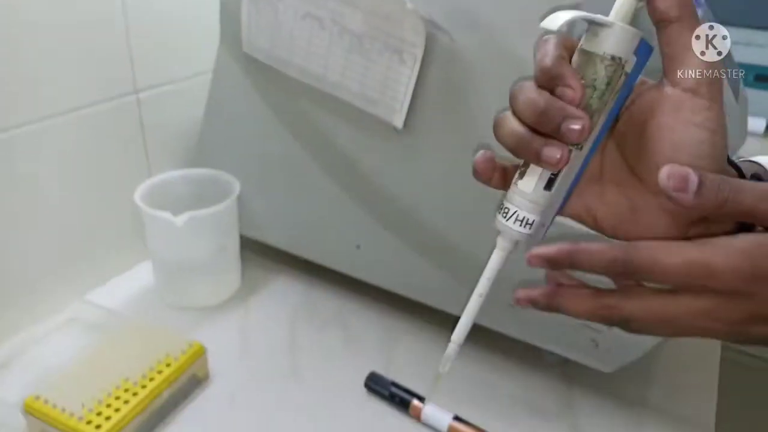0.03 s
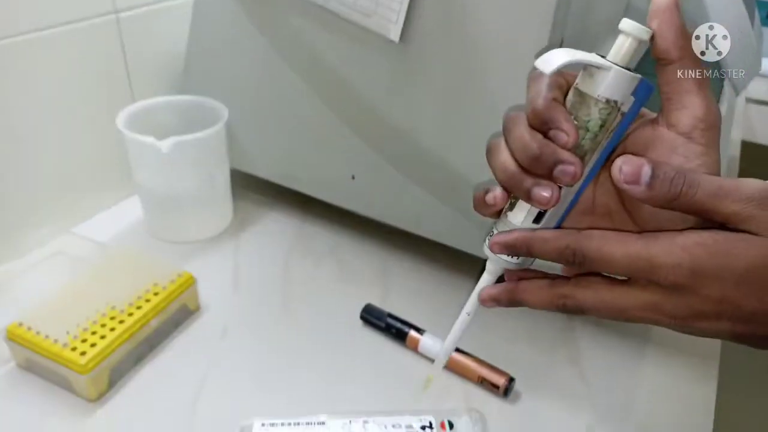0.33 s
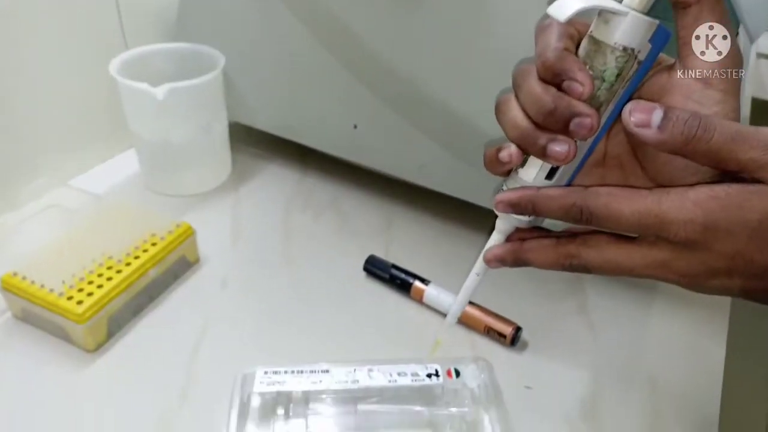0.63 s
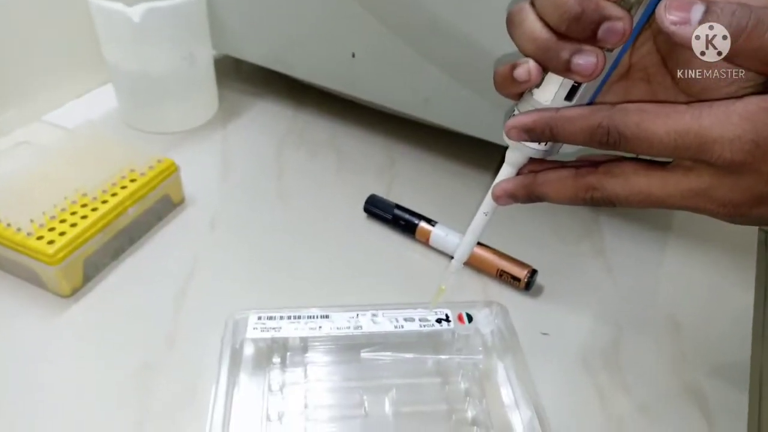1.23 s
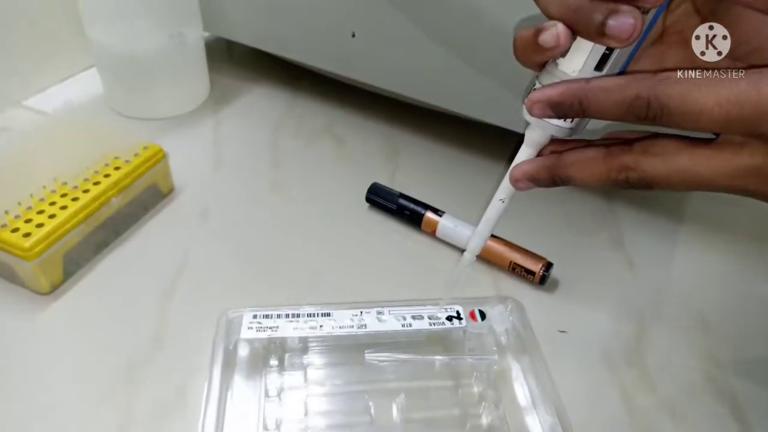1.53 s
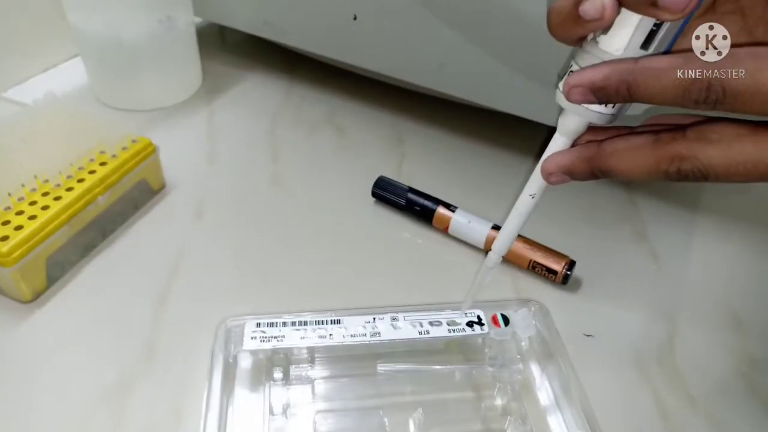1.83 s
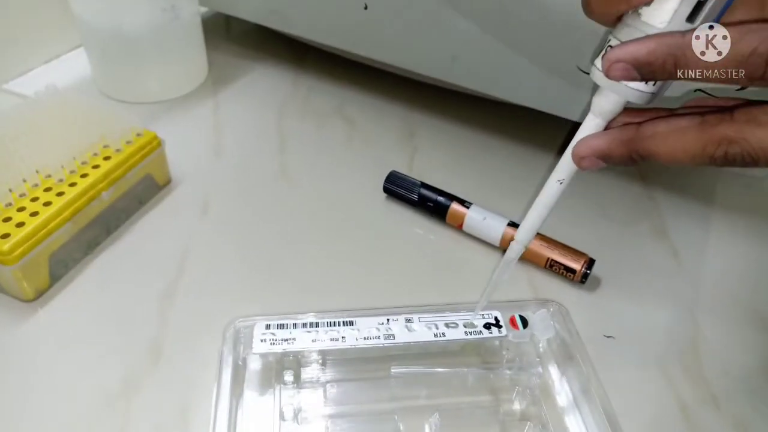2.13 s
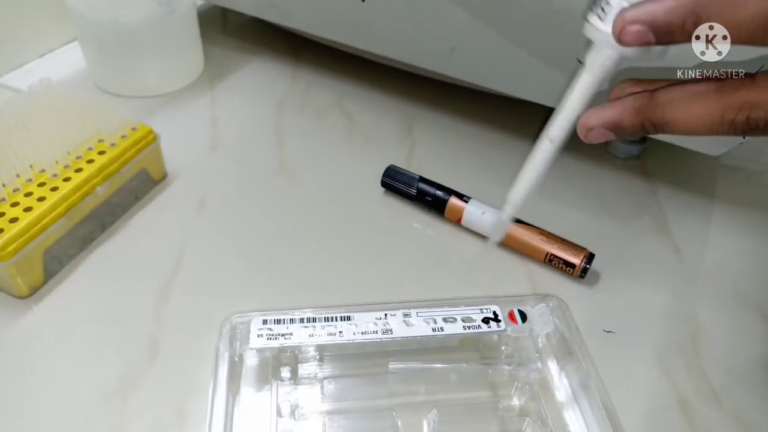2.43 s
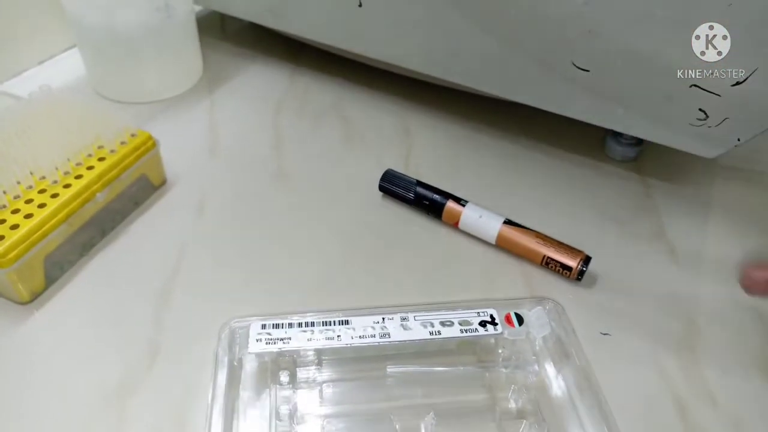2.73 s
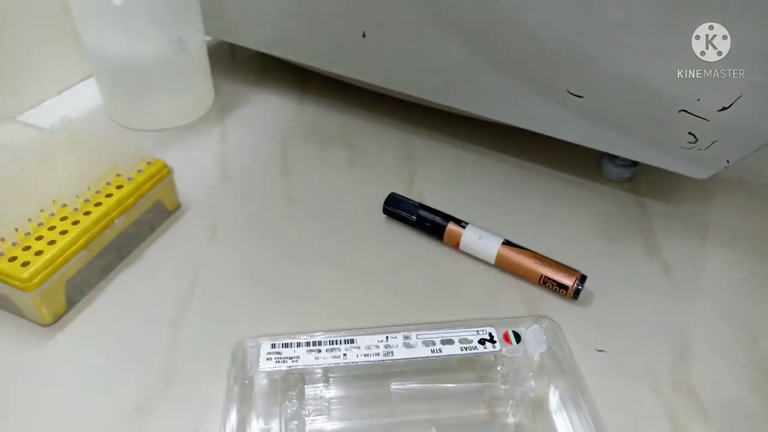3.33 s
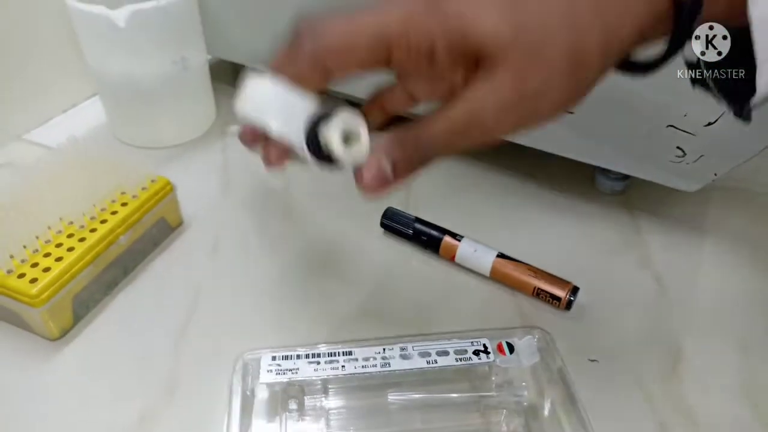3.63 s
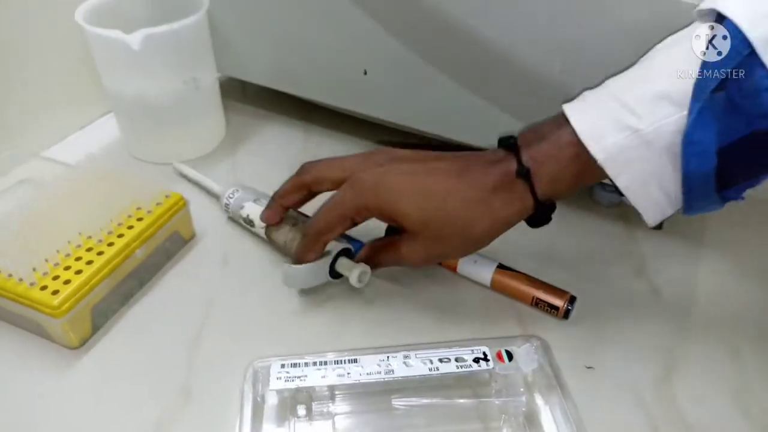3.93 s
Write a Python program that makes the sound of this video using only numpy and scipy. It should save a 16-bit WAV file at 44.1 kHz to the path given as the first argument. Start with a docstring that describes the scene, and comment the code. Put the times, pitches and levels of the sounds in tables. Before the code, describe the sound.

Scattered light clicks come from a plastic pipette after a brief brush of a hand. A quick plastic rattle, a sharp snap and a final clack follow, over steady machine hum and fan hiss in a small, slightly echoing lab.

```python
"""A plastic pipette is worked over a bench in a small tiled laboratory. Plunger and tip click softly, loose
plastic rattles, one hard snap rings out and a last clack follows. Each contact rings the modes of the hollow
plastic and adds a bright crack of chatter. A hand brushes the barrel, the plunger rubs once and the plastic
squeaks once, faintly; behind it a machine hums and its fan hisses. Tiles and bench reflect the contacts and the
brushing."""
import sys
import numpy as np
from scipy import signal
from scipy.fft import rfft, irfft, next_fast_len
from scipy.io import wavfile
from scipy.ndimage import uniform_filter1d

SR = 44100
rng = np.random.default_rng(int(sys.argv[2]) if len(sys.argv) > 2 else 0)


def to_wav(sig):
    """Store sig (one row per channel, or 1-D mono) as 16-bit WAV at the path in sys.argv[1].

    Samples outside -1..1 are clipped; the rate is SR.
    """
    pcm = np.clip(np.atleast_2d(sig), -1, 1) * 32767
    pcm = np.round(pcm).astype(np.int16)
    wavfile.write(sys.argv[1], SR, pcm.T)  # frames by channels


N = 176400


def from_db(db):
    """Decibels to gain."""
    return 10 ** (np.asarray(db) / 20)


def unit_rms(x):
    """Scale each channel to rms 1."""
    return x / np.sqrt(np.mean(x ** 2, axis=-1, keepdims=True) + 1e-20)


def at_hz(points, hz):
    """Read a table on a log-frequency axis."""
    f, value = np.transpose(points)
    return np.interp(np.log(np.maximum(hz, 1)), np.log(f), value)


def pan(pan_db):
    """Stereo gains for a left-minus-right level."""
    return from_db(np.array([[.5], [-.5]]) * pan_db)


def colour(x, points, scale=1):
    """Minimum-phase filter following a (f/Hz, gain/dB) table, its dB times scale."""
    n = 2 * next_fast_len(x.shape[-1])
    gain = from_db(scale * at_hz(points, np.arange(n // 2 + 1) * SR / n))
    cepstrum = irfft(np.log(gain))
    cepstrum[1:n // 2] *= 2
    cepstrum[n // 2 + 1:] = 0
    return irfft(rfft(x, n) * np.exp(rfft(cepstrum)))[..., :x.shape[-1]]


def drift(rate_hz):
    """Low-passed random motion, rms 1."""
    hz = np.arange(N // 2 + 1) * SR / N
    return unit_rms(irfft(rfft(rng.standard_normal(N)) / (1 + (hz / rate_hz) ** 2) ** 2, N))


# machine tones: f/Hz, rms level/dB, wavering share of power/0-1
HUM_TONES = [(72.3, -58, 0.28), (96.3, -50.5, 0.82), (133.8, -56.5, 0.27), (158.3, -58.5, 0.49),
             (177.2, -61.5, 0), (284.3, -56.5, 1), (314, -59, 0.76), (339.2, -60.5, 0), (364, -71, 0.1)]
# swells of nearby tones: f/Hz, peak t/s, 1/e half-width/s, boost/dB
HUM_SWELLS = [(134.5, 0.73, 0.36, 10), (134.5, 1.93, 0.18, 7.5), (176.5, 1.286, 0.11, 12.5),
              (176.5, 2.32, 0.48, 9), (323.7, 1.85, 1, 7.5)]


def machine_hum(waver_hz=3.96, swell_reach_hz=16):
    """Low machine tones; most waver, some swell for a while."""
    t, hum = np.arange(N) / SR, 0
    for hz, db, share in HUM_TONES:
        waver = drift(waver_hz) + 1j * drift(waver_hz)
        phasor = np.sqrt(1 - share) + np.sqrt(share / 2) * waver
        tone = np.real(phasor * np.exp(2j * np.pi * (hz * t + rng.random())))
        swell_db = sum(boost_db * np.exp(-((t - peak_s) / width_s) ** 2)
                       for near_hz, peak_s, width_s, boost_db in HUM_SWELLS
                       if abs(hz - near_hz) < swell_reach_hz)
        hum = hum + from_db(db + swell_db) * unit_rms(tone)
    return hum


# rumble spectrum: f/Hz, density/(dB per Hz)
RUMBLE_SPECTRUM = [(20, -92), (54, -100.5), (68, -71.5), (105, -72), (150, -76), (190, -75.5), (235, -78),
                   (320, -71), (390, -79.5), (480, -89), (700, -94.5), (3000, -135)]


def machine_rumble():
    """Low machine noise, alike on both sides."""
    return np.sqrt(SR / 2) * colour(rng.standard_normal(N), RUMBLE_SPECTRUM)


# fan air spectrum: f/Hz, density/(dB per Hz)
FAN_SPECTRUM = [(40, -106), (200, -82.5), (350, -83.5), (550, -95.5), (780, -92), (1000, -87),
                (1300, -92.5), (1720, -92), (1920, -81), (2150, -91.5), (2450, -93.5), (2680, -85),
                (2950, -94), (3700, -107), (4720, -108), (4900, -101.5), (5100, -108), (6500, -110),
                (7500, -116), (12000, -114.5), (15500, -113.5)]


def fan_hiss(flicker_db=0.96):
    """Fan air spread through the room; its level flickers slightly."""
    air = np.sqrt(SR / 2) * colour(rng.standard_normal((2, N)), FAN_SPECTRUM)
    return air * from_db(flicker_db * drift(rate_hz=29))


# room decay: f/Hz, T60/s
ROOM_T60 = [(300, 0.85), (2500, 0.46), (6000, 0.47), (15000, 0.22)]


def room(x, build_s=0.0017):
    """Dense reflections from tiles and bench, different on each side; the treble dies first."""
    t, hz = np.arange(SR) / SR, np.arange(SR // 2 + 1)
    white = rfft(rng.standard_normal((2, SR)))
    edges_hz = np.geomspace(100, SR / 2, 13)
    tail = 0
    for lo, hi in zip(edges_hz, edges_hz[1:]):
        band = irfft(white * ((hz >= lo) & (hz < hi)))
        tail = tail + band * from_db(-60 * t / at_hz(ROOM_T60, np.sqrt(lo * hi)))
    tail = unit_rms(tail * (1 - np.exp(-t / build_s))) / np.sqrt(SR)
    return signal.fftconvolve(x, tail, axes=-1)[:, :N]


# brushing swells (hand and sleeve, except the plunger rubbing at 1.56 s): peak t/s, rise/s, fall/s, level/dB
BRUSH_SWELLS = [(.05, 0.13, 0.02, -58.5), (0.139, 0.043, 0.057, -46), (.41, 0.17, 0.14, -64.5),
                (1.56, 0.13, 0.2, -70), (2.719, 0.11, 0.15, -72.5), (3.0, 0.14, 0.23, -69)]
# friction spectrum: f/Hz, relative level/dB
BRUSH_SPECTRUM = [(500, 7), (1500, 0), (2300, 11), (3300, 12), (4000, 3.5), (6500, 2.5), (8000, -2.5),
                  (10000, -0.5), (11900, 2), (15500, -4)]


def brushing(grain_db=1.5):
    """Grainy friction of skin and sleeve, and once of the plunger rubbing in its barrel, swelling and fading
    with each move."""
    t = np.arange(N) / SR
    envelope = sum(from_db(db) * np.exp(-((t - peak_s) / np.where(t < peak_s, rise_s, fall_s)) ** 2)
                   for peak_s, rise_s, fall_s, db in BRUSH_SWELLS)
    grain = from_db(grain_db * drift(rate_hz=200))
    return envelope * grain * unit_rms(colour(rng.standard_normal((2, N)), BRUSH_SPECTRUM))


def plastic_squeak(peak_s=1.605, width_s=.03, top_hz=14600, arch_hz=450, level_db=-72.5):
    """A thin squeak whose pitch arches up and down."""
    u = (np.arange(N) / SR - peak_s) / width_s
    hz = top_hz - arch_hz * np.minimum(u * u, 2) + 130 * drift(rate_hz=340)
    tone = np.sin(2 * np.pi * np.cumsum(hz) / SR)
    return from_db(level_db) * np.exp(-u * u) * tone * pan(pan_db=4.9)


def resonate(x, hz, t60_s):
    """One mode, peak gain 1."""
    r = from_db(-60 / (t60_s * SR))
    poles = [1, -2 * r * np.cos(2 * np.pi * hz / SR), r * r]
    return signal.lfilter(np.array([1, 0, -1]) * (1 - r * r) / 2, poles, x)


HIT_S, LEVEL_WINDOW_S = .16, .002  # hit levels: rms as if all energy fell within the window


def chatter_burst(t, rise_s, decay_s, smooth_hz=300):
    """A short burst of contact chatter, its energy spread evenly over frequency."""
    burst = rng.standard_normal(len(t)) * (1 - np.exp(-(t / rise_s) ** 2)) * np.exp(-t / decay_s)
    power = uniform_filter1d(np.abs(rfft(burst)[1:]) ** 2, size=int(smooth_hz * HIT_S))
    hz = np.arange(1, len(power) + 1) / HIT_S
    return colour(burst, np.column_stack([hz, -10 * np.log10(power + 1e-12)]))


# crack of plastic on plastic: f/Hz, relative level/dB
CRACK_SPECTRUM = [(300, -25), (1500, -18), (3500, 0), (5000, 0.5), (6400, 3.5), (8200, -5), (10800, -1),
                  (11750, 2), (12600, 0), (14300, -3), (15500, -5.5)]


def plastic_hits(hits, modes, rise_s, blow_db, correlation=0.24, focus_db_per_octave=8.25):
    """Each contact is one blow amid chatter: it rings the hollow plastic and gives a bright crack."""
    t = np.arange(int(HIT_S * SR)) / SR
    out = np.zeros((2, N + SR))
    blow = from_db(blow_db) * signal.unit_impulse(len(t), int(rise_s * SR))
    for start_s, knock_db, centre_hz, crack_db, decay_s, pan_db in hits:
        chatter = np.array([chatter_burst(t, rise_s, decay_s) for _ in range(2)])
        left = correlation * chatter[1] + np.sqrt(1 - correlation ** 2) * chatter[0]
        force = blow + np.array([left, chatter[1]])
        ring = sum((-1) ** k * from_db(db) * resonate(force, hz, t60_s)
                   for k, (hz, db, t60_s) in enumerate(modes))
        # where the blow lands decides which modes ring most
        focus = [(centre_hz * 2.0 ** k, -abs(k) * focus_db_per_octave) for k in range(-3, 4)]
        knock = from_db(knock_db) * unit_rms(colour(ring, focus))
        crack = from_db(crack_db) * pan(pan_db) * unit_rms(colour(chatter, CRACK_SPECTRUM))
        start = int(start_s * SR)
        out[:, start:start + len(t)] += (knock + crack) * np.sqrt(LEVEL_WINDOW_S / HIT_S)
    return out[:, :N]


# plunger and tip contacts: t/s, knock/dB, knock centre/Hz, crack/dB, chatter decay/s, crack pan/dB
PLUNGER_HITS = [(.3665, -42, 1340, -57, 0.003, 3), (1.6750, -43, 1350, -68, 0.0018, 2),
                (1.7154, -28, 2100, -40, 0.0032, 2), (1.7995, -55, 3020, -43.5, 0.005, -3),
                (2.0711, -36, 1570, -43, 0.0035, 3.5), (2.1895, -42, 1260, -58, 0.0029, 1),
                (2.594, -68, 2600, -63.5, 0.0024, 14), (2.672, -73, 2670, -60.5, 0.025, 18)]
# modes they ring: f/Hz, relative level/dB, T60/s
PLUNGER_MODES = [(630, 5.5, 0.018), (1200, 5.5, 0.0076), (1520, 6.5, 0.0094), (1770, 10, 0.01),
                 (2440, 10, 0.0085), (3450, 4, 0.011)]


def plunger_clicks():
    """Plunger and tip click softly."""
    return plastic_hits(PLUNGER_HITS, PLUNGER_MODES, rise_s=0.00035, blow_db=-6.5)


# loose-part contacts: t/s, knock/dB, knock centre/Hz, crack/dB, chatter decay/s, crack pan/dB
RATTLE_HITS = [(3.186, -34.5, 2240, -54, 0.0028, -3), (3.1885, -34.5, 2480, -41.5, 0.0025, 0),
               (3.222, -41, 2700, -44, 0.0045, 1), (3.2565, -34.5, 2450, -38.5, 0.007, 5),
               (3.2635, -33, 2360, -50, 0.0034, 10), (3.277, -39, 2510, -37, 0.004, 7),
               (3.282, -35, 2550, -40.5, 0.0019, 2.5), (3.339, -69, 2600, -53, 0.0033, 15),
               (3.3575, -37.5, 3140, -35.5, 0.012, 3), (3.360, -35.5, 850, -52, 0.0055, 0),
               (3.4050, -32, 4650, -34.5, 0.0027, 1.5), (3.415, -45, 4370, -35, 0.0017, 1),
               (3.544, -29, 2330, -37, 0.042, 12), (3.5517, -30.5, 2340, -37, 0.01, 19)]
# modes they ring: f/Hz, relative level/dB, T60/s
RATTLE_MODES = [(613, -0.5, 0.053), (1290, -4, 0.01), (2260, 2.5, 0.019), (2540, 5, 0.028),
                (2850, -1, 0.012), (3220, -2, 0.013), (4200, -13, 0.0015)]


def loose_rattle():
    """Loose plastic parts knock together in a quick run."""
    return plastic_hits(RATTLE_HITS, RATTLE_MODES, rise_s=0.000965, blow_db=-14)


# hard contacts: t/s, knock/dB, knock centre/Hz, crack/dB, chatter decay/s, crack pan/dB
SNAP_HITS = [(3.5656, -15.5, 2410, -22.5, 0.0017, 6), (3.5703, -26, 2330, -22, 0.0021, -3),
             (3.9775, -31, 1740, -32, 0.0044, -5), (3.980, -29, 2730, -25.5, 0.0024, 5.5)]
# modes they ring: f/Hz, relative level/dB, T60/s
SNAP_MODES = [(590, 4, 0.013), (1430, 1, 0.017), (1860, -5, 0.0075), (2170, 2, 0.015), (2543, 5, 0.012),
              (2830, 1.5, 0.013), (3450, -3.5, 0.011), (6180, -6, 0.04)]


def hard_snaps():
    """The snap and the last clack, each two contacts milliseconds apart."""
    return plastic_hits(SNAP_HITS, SNAP_MODES, rise_s=0.00126, blow_db=-6)


def scene():
    """Pipette handling and its reflections over the machine."""
    # signal, room send/dB
    sources = [(plunger_clicks(), -7.5), (loose_rattle(), -3.5),
               (hard_snaps(), -4), (brushing(), -1.5)]
    direct = sum(x for x, _ in sources)
    reflections = room(sum(x * from_db(send_db) for x, send_db in sources))
    return direct + reflections + plastic_squeak() + machine_hum() + machine_rumble() + fan_hiss()


# colour of the two microphone ports: f/Hz, left minus right/dB
PORT_BALANCE = [(60, 0), (160, 2.5), (350, -2.5), (700, 1), (1300, -2.5), (1900, -3.5), (2500, -6.5),
                (3300, -6), (4400, -1.5), (7500, -3.5), (9500, -0.5), (11700, 11.5), (13000, 5),
                (15500, 7.5)]


def record(dry, cutoff_hz=15800):
    """Each microphone port adds its colour; the top is cut steeply."""
    left = colour(dry[0], PORT_BALANCE, scale=.5)
    right = colour(dry[1], PORT_BALANCE, scale=-.5)
    lowpass = signal.ellip(12, .2, 80, cutoff_hz, fs=SR, output="sos")
    return signal.sosfilt(lowpass, np.array([left, right]))


dry = scene()
out = record(dry)
to_wav(out)
```